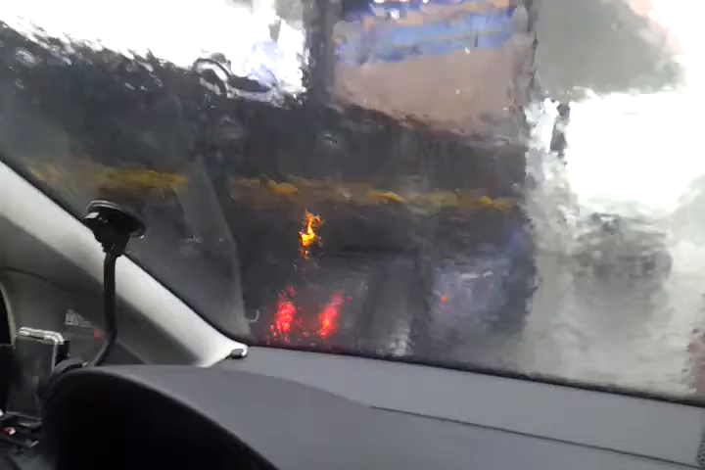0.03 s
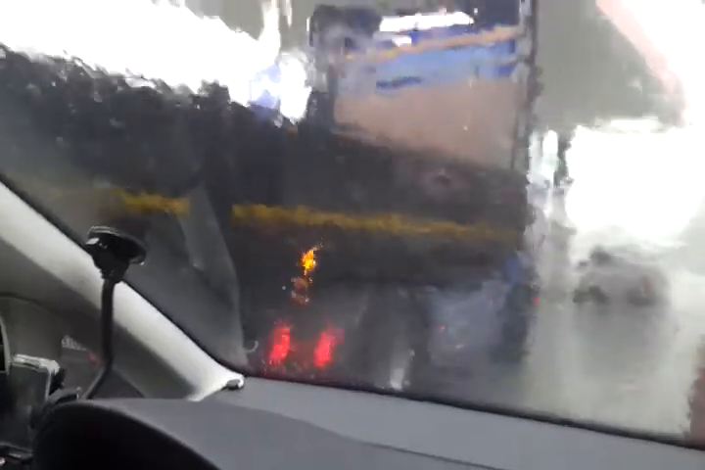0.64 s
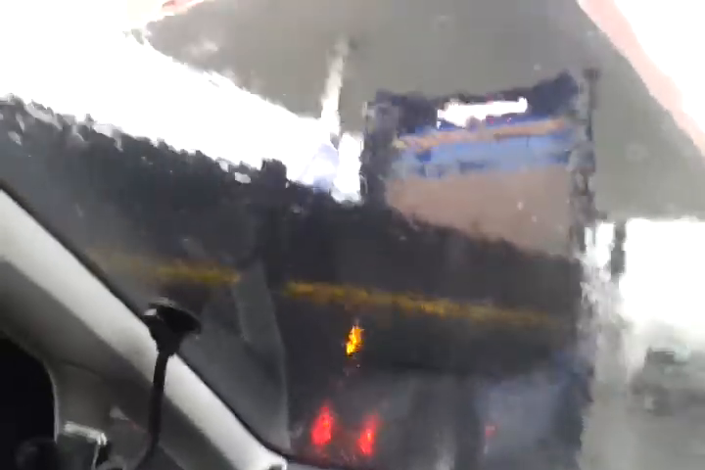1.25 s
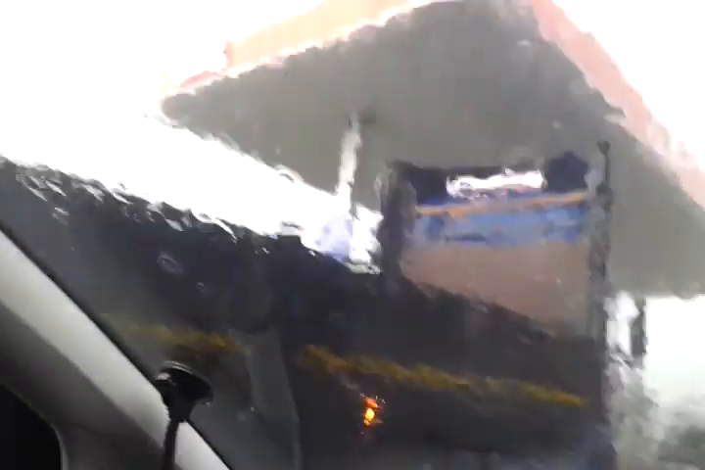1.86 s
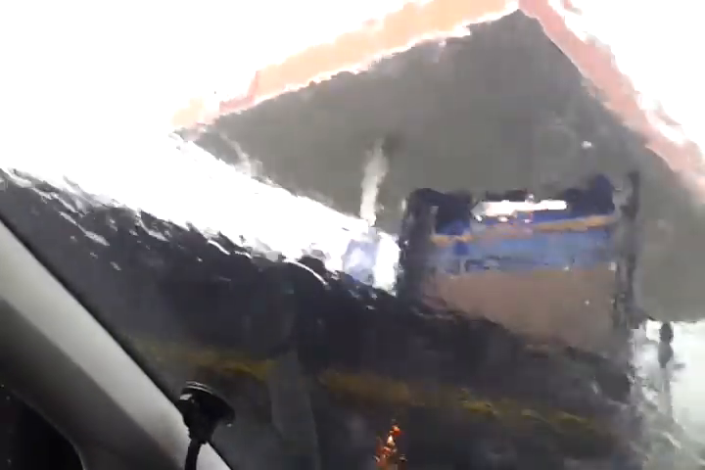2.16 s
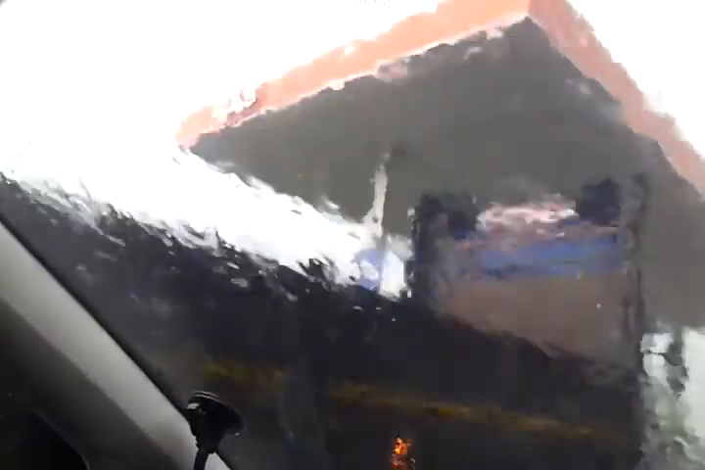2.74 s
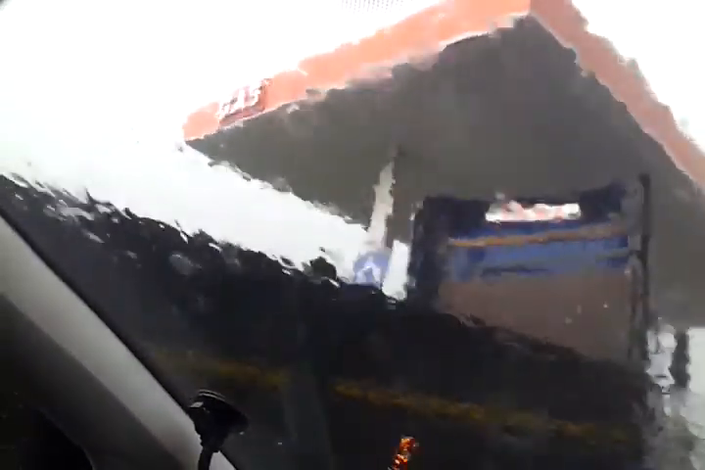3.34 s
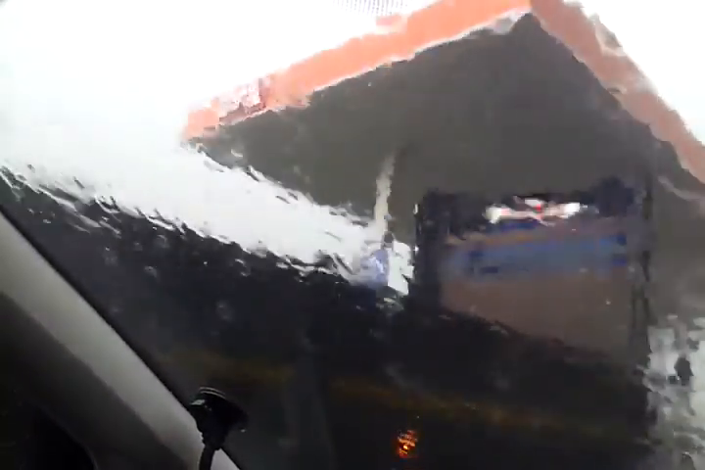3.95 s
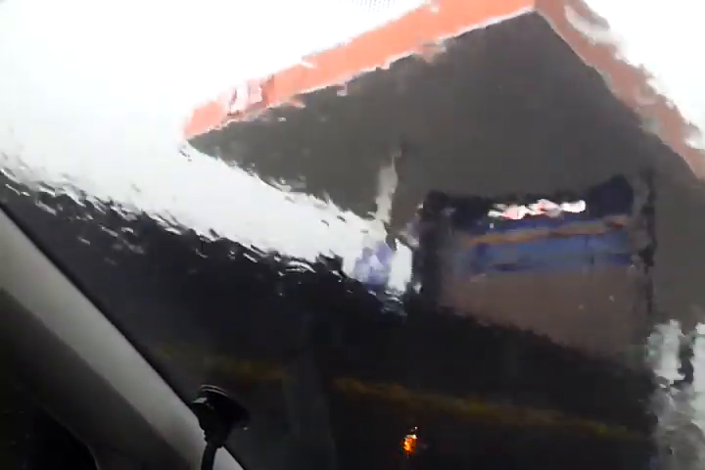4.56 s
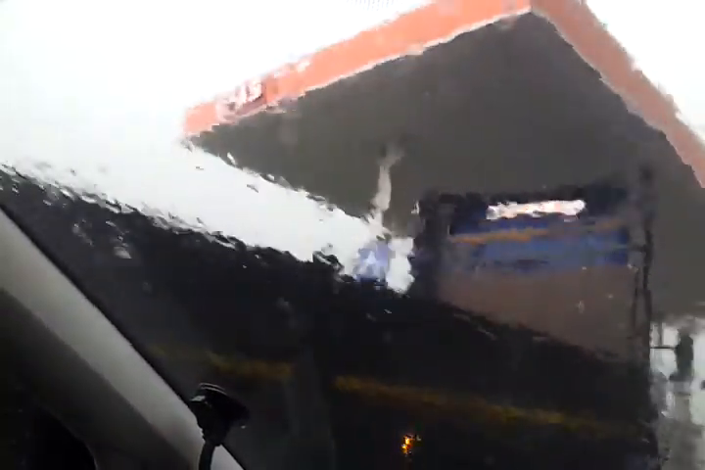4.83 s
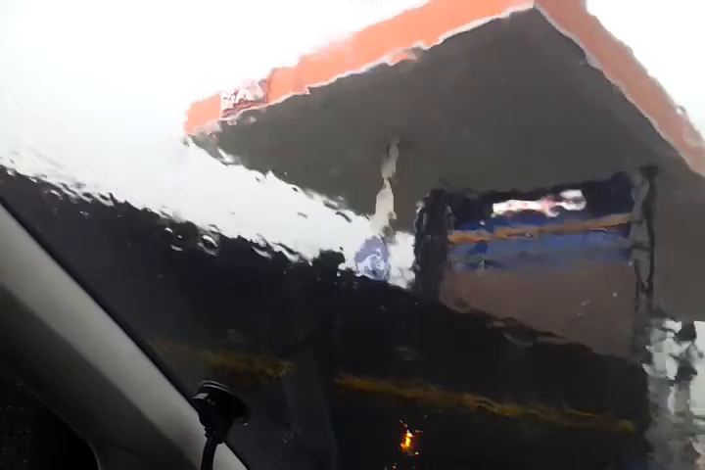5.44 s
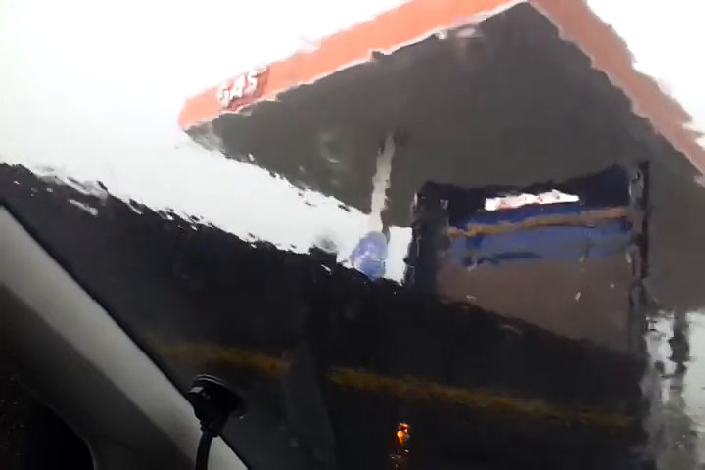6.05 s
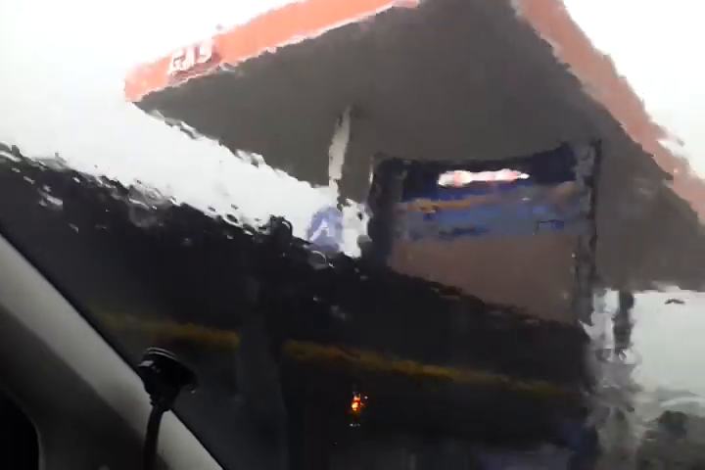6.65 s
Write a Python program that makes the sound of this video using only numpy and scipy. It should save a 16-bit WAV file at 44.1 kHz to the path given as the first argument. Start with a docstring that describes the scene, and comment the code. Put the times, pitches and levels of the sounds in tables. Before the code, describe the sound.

Heavy rain falls on a parked car, heard close up from the front seat. After a brief silence, dull drumming on the roof and bright spatter on the windshield fade in over a low idling hum. Wet splats and hard snaps hit the glass, with occasional roof thuds and small metallic pings. Gusts swell the rain twice, then it eases and single drops stand out, including one heavy thud.

```python
"""Heavy rain on a parked car, heard from the front seat while the engine idles.
After a short silence the bed fades in: a low hum, drumming on the lined roof, spatter on the windshield.
From about 1 s, wet splats and hard snaps hit the glass, the odd fat drop thuds on the roof and a small
metal part pings. Gusts swell the rain near 2.4 s and again towards 4 s, where the hardest snap lands.
The wash then eases and single drops stand out, with the heaviest thud at 5.2 s."""
import sys
import numpy as np
from scipy import signal
from scipy.fft import rfft, irfft
from scipy.io import wavfile

SR = 44100
rng = np.random.default_rng(int(sys.argv[2]) if len(sys.argv) > 2 else 0)


def persist_wave(psi):
    """Save psi, clipped to +-1, as 16-bit WAV."""
    counts = np.round(np.clip(psi, -1, 1) * 32767).astype(np.int16)
    wavfile.write(sys.argv[1], SR, np.atleast_2d(counts).T)


N = 295029
TIME = np.arange(N) / SR
AGE = np.arange(4096) / SR  # seconds since a drop landed


def gain_of(db):
    """Decibels to an amplitude factor."""
    return 10 ** (np.asarray(db) / 20)


def unit_rms(x):
    """Scales to rms 1."""
    return x / np.sqrt(np.mean(x ** 2) + 1e-20)


def at_peak(x, peak_db):
    """Scales a hit to peak at peak_db."""
    return gain_of(peak_db) * x / abs(x).max()


def curve_at(points, hz):
    """Reads a curve on a log-frequency axis."""
    freqs, values = np.transpose(points)
    return np.interp(np.log(hz + 1), np.log(freqs + 1), values)


def add(mix, start_s, sound):
    """Mixes a sound in at start_s."""
    part = mix[round(start_s * SR):][:len(sound)]
    part += sound[:len(part)]


def wander(top_hz):
    """Random drift of rms 1, with nothing above top_hz."""
    spectrum = rfft(rng.standard_normal(N))
    return unit_rms(irfft(spectrum * (np.fft.rfftfreq(N, 1 / SR) < top_hz), N))


def arrivals(per_s):
    """Random start times in seconds, at a mean rate."""
    return TIME[rng.random(N) < per_s / SR]


def equalise(x, curve, peaks=()):
    """Minimum-phase EQ: a smooth curve with resonant peaks on top."""
    hz = np.fft.rfftfreq(len(AGE), 1 / SR)
    db = curve_at(curve, hz) + sum(lift / (1 + (2 * (hz - f) / width) ** 2) for f, width, lift in peaks)
    log_gain = np.log(gain_of(np.concatenate([db, db[-2:0:-1]])))
    taps = np.fft.ifft(np.exp(np.conj(signal.hilbert(log_gain)))).real
    return signal.oaconvolve(x, taps)[:len(x)]


# Partials of the idle hum: firing_multiple, level_db
IDLE_PARTIALS = [(1, -55.5), (2, -51.5), (3, -53.5)]


def engine(firing_hz=30.3, rumble_db=-47):
    """The idle comes through the body as a low, slightly unsteady hum over an irregular rumble."""
    turns = np.cumsum(firing_hz * (1 + .035 * wander(top_hz=6))) / SR
    hum = np.zeros(N)
    for multiple, level_db in IDLE_PARTIALS:
        amplitude = np.sqrt(2) * gain_of(level_db + 2 * wander(top_hz=2))
        hum += amplitude * np.sin(2 * np.pi * multiple * turns)
    return hum + gain_of(rumble_db) * wander(top_hz=71)


# How long a drop rings in the body and cabin: freq_hz, t60_s
BODY_DECAY = [(100, 0.086), (400, 0.09), (1500, 0.071), (4000, 0.057), (10000, 0.13)]


def body_ring():
    """The many modes of one spot on the body: noise dying away band by band, with energy 1."""
    hz, t, bands = signal.stft(rng.standard_normal(len(AGE)), SR, nperseg=128)
    decay = gain_of(-60 * t / curve_at(BODY_DECAY, hz)[:, None])
    tail = signal.istft(bands * decay, SR)[1][:len(AGE)]
    return tail / np.linalg.norm(tail)


def impacts(per_s, spread_db, max_size):
    """Drops land at random as impulses, spread_db louder per unit of size; big ones are rare."""
    lands = rng.random(N) < per_s / SR
    size = np.minimum(rng.exponential(1, N), max_size)
    return lands * gain_of(spread_db * size)


def patter(per_s, spread_db, max_size, click_gain, spots):
    """Rain scatters over several spots; each drop gives a click and that spot's ring."""
    drops = impacts(per_s, spread_db, max_size)
    spot = rng.integers(0, spots, N)
    clicks = drops * rng.choice([-1, 1], N)
    rings = sum(signal.oaconvolve(clicks * (spot == k), body_ring())[:N] for k in range(spots))
    return click_gain * clicks + rings


# Level ride of the roof drumming as gusts come and go: time_s, level_db
ROOF_GUSTS = [(0.9, -35.5), (1.2, -32), (1.48, -27), (1.66, -27.5), (1.82, -29.5), (2.3, -24.5),
              (2.52, -24), (2.72, -27), (2.88, -31), (3.0, -27), (3.12, -29), (3.28, -27), (3.6, -27.5),
              (3.8, -25), (3.98, -24), (4.3, -31.5), (4.57, -32), (4.75, -32.5), (4.83, -36.5),
              (4.96, -30.5), (5.3, -31), (5.47, -29), (5.62, -31), (5.81, -29), (5.88, -33), (6.1, -33.5),
              (6.25, -29), (6.35, -29), (6.46, -28), (6.56, -29), (6.68, -30.5)]
ROOF_DB = -30.5  # in usual rain


def roof_gust_db(time_s):
    """How far the wind lifts the rain on the roof above its usual level."""
    return np.interp(time_s, *np.transpose(ROOF_GUSTS)) - ROOF_DB


# Dull tone of a drop through the roof lining: freq_hz, gain_db
ROOF_EQ = [(20, -8.5), (45, -8.5), (75, -13.5), (115, -3), (170, -3), (290, 2.2), (480, -1.1), (720, -2.5),
           (1200, -4), (1550, -6.5), (2200, -6), (2800, -14), (5000, -17), (12000, -42)]
# Roof panel resonances: centre_hz, width_hz, lift_db
PANEL_PEAKS = [(129.7, 34, 5), (366, 5.7, 4), (477, 46, 4), (830, 100, 3), (1126, 29, 3), (1660, 10, 11)]


def roof():
    """Thousands of drops a second merge into a dull drumming that flutters a little."""
    drops = patter(per_s=3000, spread_db=3.5, max_size=3.07, click_gain=0.35, spots=40)
    drumming = unit_rms(equalise(drops, ROOF_EQ, PANEL_PEAKS))
    flutter_db = 0.64 * wander(top_hz=7.7)
    return drumming * gain_of(ROOF_DB + roof_gust_db(TIME) + flutter_db)


# Level ride of the windshield spatter: time_s, level_db
GLASS_GUSTS = [(0.9, -42), (1.25, -41), (1.46, -35.5), (1.85, -38), (2.1, -31), (2.25, -33), (2.34, -27),
               (2.47, -32.5), (2.54, -34), (2.8, -38), (3.1, -38), (3.5, -33.5), (3.84, -31), (4.05, -34.5),
               (4.35, -39.5), (4.57, -44), (4.74, -41), (4.87, -48.5), (4.96, -39.5), (5.15, -44.5),
               (5.33, -41), (5.48, -39.5), (5.8, -40.5), (6.07, -43.5), (6.26, -36.5), (6.46, -38.5),
               (6.68, -37.5)]
GLASS_DB = -38  # in usual rain


def glass_gust_db(time_s):
    """Lift above usual rain on the windshield, which faces the wind and meets gusts a little sooner."""
    return np.interp(time_s, *np.transpose(GLASS_GUSTS)) - GLASS_DB


# Bright tone of a drop through the windshield: freq_hz, gain_db
GLASS_EQ = [(200, -13), (800, -1.5), (2000, 4), (3400, 8.5), (5000, 1.5), (6300, 3.5), (7600, 2.5),
            (8700, -2.5), (10500, -11.5), (12000, -69)]
# Sizzle of fine droplets falling back on the glass: freq_hz, gain_db
SPRAY_EQ = [(2000, -25), (6000, 9), (9500, 6), (11300, 4.5), (12000, -8.5)]


def windshield(spray_db=-53.5):
    """Drops spatter brightly on the bare glass, landing in clumps and throwing up a fine spray."""
    drops = patter(per_s=1000, spread_db=2, max_size=9.6, click_gain=0.41, spots=16)
    droplets = patter(per_s=630, spread_db=7.5, max_size=3.5, click_gain=0.8, spots=8)
    spatter = unit_rms(equalise(drops, GLASS_EQ))
    spray = unit_rms(equalise(droplets, SPRAY_EQ))
    gust_db = glass_gust_db(TIME)
    spatter *= gain_of(GLASS_DB + gust_db + 1.9 * wander(top_hz=27))
    spray *= gain_of(spray_db + 0.97 * gust_db + 2.7 * wander(top_hz=13))
    return spatter + spray


# Attack of a near drop, before the glass rings: freq_hz, gain_db
TICK_EQ = [(100, -14), (500, 12), (1500, 0.5), (3500, -3.5), (6500, 5.5), (8500, -12), (12000, -16)]
# Fizz of a bursting drop: freq_hz, gain_db
SPLASH_EQ = [(500, -14), (2000, -1.5), (3600, 0), (5500, 1.5), (7400, 5), (9000, -5), (12000, -14.5)]


def near_ticks(level_db=-42, fizz_decay_s=0.022, spots=8):
    """Drops right in front all push the glass the same way: a crisp tick with a brief fizz."""
    pushes = -impacts(per_s=55, spread_db=12.5, max_size=1.66)
    spot = rng.integers(0, spots, N)
    decay = np.exp(-AGE / fizz_decay_s)
    fizz = sum(signal.oaconvolve(pushes * (spot == k), body_ring() * decay)[:N] for k in range(spots))
    ticks = equalise(pushes, TICK_EQ) + 1.46 * equalise(fizz, SPLASH_EQ)
    # single drops lose less than the wash does when a gust eases
    return unit_rms(ticks) * gain_of(level_db + 0.82 * glass_gust_db(TIME))


# Featured splats on the wet glass: start_s, peak_db, decay_ms, resonance_hz
SPLAT_HITS = [(0.952, -21.5, 15, 4500), (1.344, -20.5, 15, 7000), (1.446, -26, 15, 5300),
              (2.103, -18, 10, 5600), (2.96, -16.5, 7.2, 3500), (3.07, -16, 6, 7200),
              (4.196, -17.5, 10, 4900), (4.285, -25, 9, 6300), (4.348, -21.5, 6, 6300),
              (4.37, -20.5, 7.2, 7100), (4.43, -34, 4, 5500), (4.52, -23, 12, 7000),
              (4.592, -25.5, 14, 3500), (4.647, -19.5, 14, 5200), (4.703, -22, 16, 3400),
              (4.723, -21, 10, 5000), (4.743, -24, 8, 4600), (4.918, -20.5, 8, 6800),
              (4.937, -21, 12, 5000), (4.978, -29, 10, 3500), (5.078, -17, 30, 4200),
              (5.112, -24, 10, 3800), (5.137, -22, 15, 4500), (5.167, -25, 10, 4000),
              (5.267, -23, 11, 2400), (5.377, -21, 12, 3000), (5.416, -24, 3.4, 6000),
              (5.736, -21, 33, 4200), (5.82, -22, 25, 4000), (6.033, -35, 5, 4500), (6.158, -29, 5, 4000),
              (6.235, -23, 25, 5500), (6.385, -24, 12, 7000), (6.498, -23, 4.6, 7500),
              (6.562, -25, 6, 5000)]
# Tone shared by all splats: freq_hz, gain_db
SPLAT_EQ = [(300, -28), (1500, 5.5), (2500, 1.5), (4500, -6), (7700, -4), (9500, -10), (12000, -24)]


def splats(stray_db=-29.5, stray_decay_ms=2.9, width_hz=1900, lift_db=8):
    """Drops slap into the film of water, each with one broad resonance; lesser strays ride the gusts."""
    out = np.zeros(N)
    strays = []
    for start_s in arrivals(per_s=12):
        peak_db = stray_db + glass_gust_db(start_s) - rng.uniform(-2, 2)
        strays.append((start_s, peak_db, stray_decay_ms, rng.uniform(3000, 7440)))
    for start_s, peak_db, decay_ms, resonance_hz in SPLAT_HITS + strays:
        slap = body_ring() * np.exp(-1000 * AGE / decay_ms)
        splat = equalise(slap, SPLAT_EQ, [(resonance_hz, width_hz, lift_db)])
        add(out, start_s, at_peak(splat, peak_db))
    return out


def snap(pitch_hz, rise_s, settle_s=0.0024, ring_t60_s=0.035):
    """The glass radiates a short blip that sinks in pitch; the dashboard throws it back, smeared."""
    def swell(age, peak_s):
        progress = np.maximum(age, 0) / peak_s
        return progress * np.exp(1 - progress)
    glide_hz = pitch_hz * (1 + 0.045 * np.exp(-AGE / settle_s))
    turns = np.cumsum(glide_hz) / SR
    echo_s = 0.0021 * rng.uniform(.85, 1.15)
    echo = 0.68 * swell(AGE - echo_s, 2 * rise_s)
    faint_ring = gain_of(-27.5 - 60 * AGE / ring_t60_s)
    return (swell(AGE, rise_s) + echo + faint_ring) * np.sin(2 * np.pi * turns)


# Hardest hits on the windshield: start_s, snap_db, pitch_hz, splash_decay_ms, crack_db
HARD_HITS = [(1.012, -21, 7460, 4.4, -32), (1.473, -27, 7070, 8, -36), (1.828, -21, 5170, 5.6, -31),
             (1.953, -26, 7600, 5, -32), (2.199, -16, 6940, 7.2, -21), (2.359, -21, 6360, 6, -30),
             (2.414, -21, 7590, 3.6, -32), (2.423, -19, 6900, 3, -28), (2.459, -13, 7000, 3.7, -19),
             (2.49, -15, 7440, 6, -27), (2.805, -22, 5360, 7.8, -34), (2.891, -23.5, 6440, 5, -38),
             (2.942, -22, 7800, 33, -27), (3.042, -23, 6960, 8, -25), (3.056, -22, 7280, 5, -29),
             (3.192, -17.5, 6600, 4, -34), (3.209, -16, 5100, 8, -25), (3.325, -22, 6000, 6.6, -17),
             (3.387, -18.5, 7150, 8, -28), (3.537, -15, 6600, 11, -28), (3.727, -23, 6600, 4, -32),
             (4.0461, -3, 6950, 17, -15), (4.477, -19, 7640, 23, -16), (5.016, -14, 6760, 45, -21),
             (5.202, -18, 7970, 30, -35), (5.248, -19.5, 7500, 1.2, -24), (5.4375, -12, 6900, 40, -11),
             (5.4927, -18, 7840, 3, -18), (5.5158, -15.5, 5470, 5.5, -12.5), (5.784, -22, 8000, 10, -23),
             (6.602, -21.5, 6600, 3.3, -26), (6.644, -21, 6140, 26, -21)]
# Bright edge as a hard drop touches the glass: freq_hz, gain_db
CRACK_EQ = [(1000, -27), (5000, -10), (9000, -1), (12000, -6)]


def hard_drops(crack_decay_s=0.0015):
    """A hard drop strikes bare glass: a crack on contact, a pitched snap, then a short splash."""
    out = np.zeros(N)
    for start_s, snap_db, pitch_hz, splash_decay_ms, crack_db in HARD_HITS:
        crack = equalise(rng.standard_normal(len(AGE)) * np.exp(-AGE / crack_decay_s), CRACK_EQ)
        splash = equalise(body_ring() * np.exp(-1000 * AGE / splash_decay_ms), SPLASH_EQ)
        splash_db = -7.5 + 0.6 * snap_db  # grows more slowly than the snap
        burst = at_peak(crack, crack_db) + at_peak(splash, splash_db)
        rise_s = 0.00025 * gain_of(snap_db / 2)  # a larger drop presses longer
        add(out, start_s, gain_of(snap_db) * snap(pitch_hz, rise_s) + burst)
    return out


# Fat drops on the roof: start_s, knock_peak_db
THUD_HITS = [(1.078, -24), (2.955, -27), (5.203, -14.5)]
# Roof modes under a fat drop: pitch_hz, relative_db, t60_s
ROOF_MODES = [(346, -1, 0.13), (462, -5, 0.17), (615, -3, 0.13), (880, -7, 0.1), (1255, -12, 0.06),
              (1650, -10, 0.08), (2050, -11, 0.04)]
# The pieces a fat drop lands in: delay_s, relative_db
THUD_PIECES = [(0, -8), (.004, -3), (.014, -3), (.028, -9)]


def thuds(flatten_s=0.0015, lining_decay_s=0.032):
    """A fat drop flattens and knocks the roof's low modes; its pieces slap down, damped by the lining."""
    out = np.zeros(N)
    modes = sum(gain_of(db - 60 * AGE / t60) * np.sin(2 * np.pi * (hz * AGE + rng.random()))
                for hz, db, t60 in ROOF_MODES)
    knock = modes * (1 - np.exp(-AGE / flatten_s))
    for start_s, peak_db in THUD_HITS:
        add(out, start_s, at_peak(knock, peak_db))
        for delay_s, relative_db in THUD_PIECES:
            slap = equalise(body_ring() * np.exp(-AGE / lining_decay_s), ROOF_EQ)
            add(out, start_s + delay_s, at_peak(slap, peak_db + relative_db))
    return out


# Featured drips on the metal part: start_s, peak_db
PING_HITS = [(1.529, -32), (2.283, -29), (2.501, -24), (2.766, -24), (3.063, -28), (4.754, -24),
             (4.84, -31), (4.888, -26), (4.938, -23), (5.346, -25), (5.374, -20), (6.261, -24)]
# Modes of the metal part: pitch_hz, relative_db, t60_s
METAL_MODES = [(1420, -1, 0.034), (1667, 5.5, 0.088), (1830, -22, 0.038), (2170, -4, 0.049)]


def pings(stray_db=-36.5, rise_s=0.003, roughness=1.4):
    """A small metal part rings briefly at each drip, roughened by the droplets that follow."""
    out = np.zeros(N)
    strays = [(start_s, stray_db + 0.85 * roof_gust_db(start_s)) for start_s in arrivals(per_s=20)]
    for start_s, peak_db in PING_HITS + strays:
        detune = 1 + 0.012 * rng.uniform(-1, 1)  # water on the metal shifts its pitch
        modes = sum(gain_of(db - 60 * AGE / t60) * np.sin(2 * np.pi * hz * detune * AGE)
                    for hz, db, t60 in METAL_MODES)
        tone = unit_rms(modes * (1 - np.exp(-AGE / rise_s)))
        droplets = unit_rms(signal.oaconvolve(body_ring(), modes)[:len(AGE)])
        add(out, start_s, at_peak(tone + roughness * droplets, peak_db))
    return out


def scene():
    """The rain bed, the single hits and the idle meet in the cabin, in mono."""
    rain_bed = roof() + windshield() + near_ticks()
    hits = hard_drops() + splats() + thuds() + pings()
    return (rain_bed + hits + engine())[None]


def record(dry, silence_s=0.7, fade_s=0.19, cutoff_hz=11950):
    """Fades in from silence and cuts the top treble with a steep low-pass."""
    fade = np.clip((TIME - silence_s) / fade_s, 0, 1)
    low_pass = signal.firwin(511, cutoff_hz, window=("kaiser", 9), fs=SR)
    return signal.oaconvolve(dry * fade, low_pass[None], "same")


dry = scene()
out = record(dry)
persist_wave(out)
```